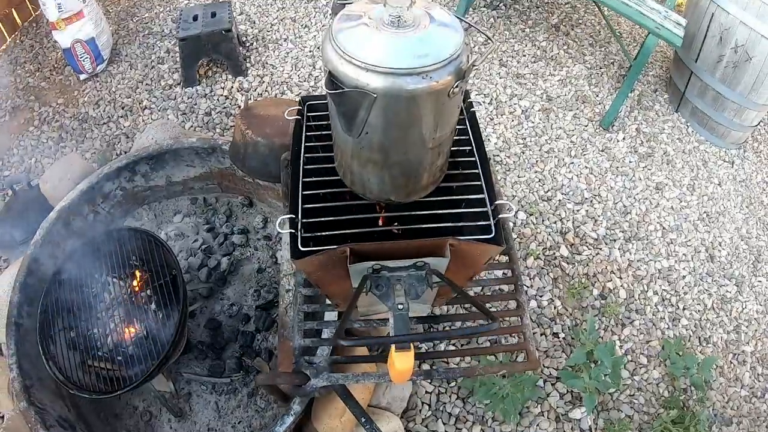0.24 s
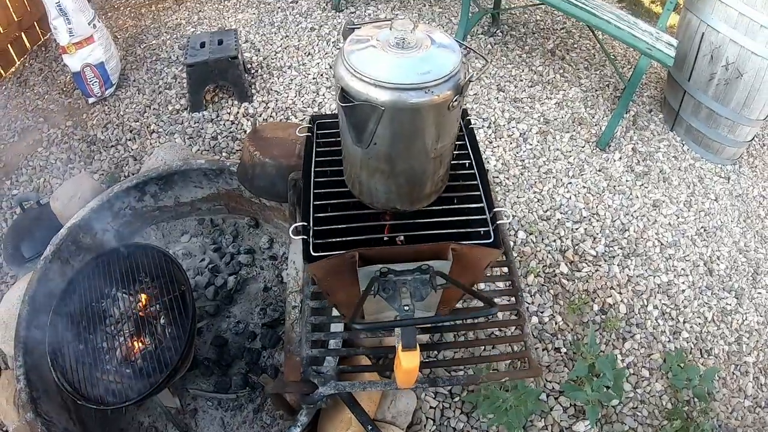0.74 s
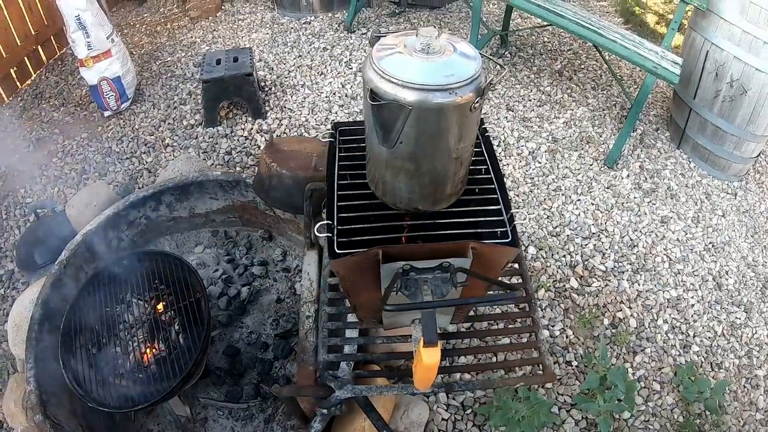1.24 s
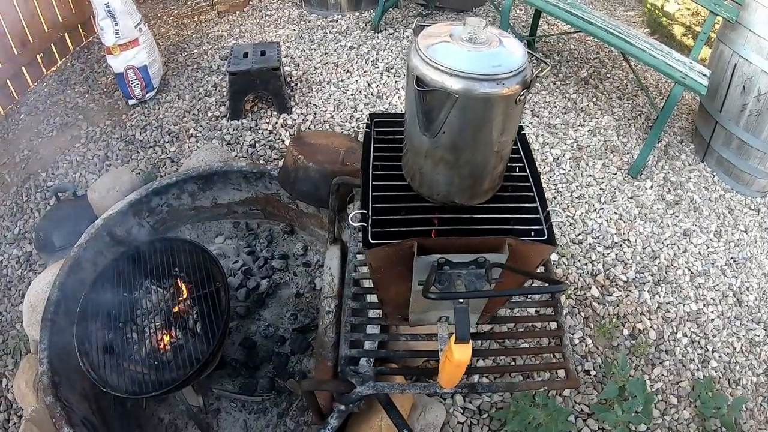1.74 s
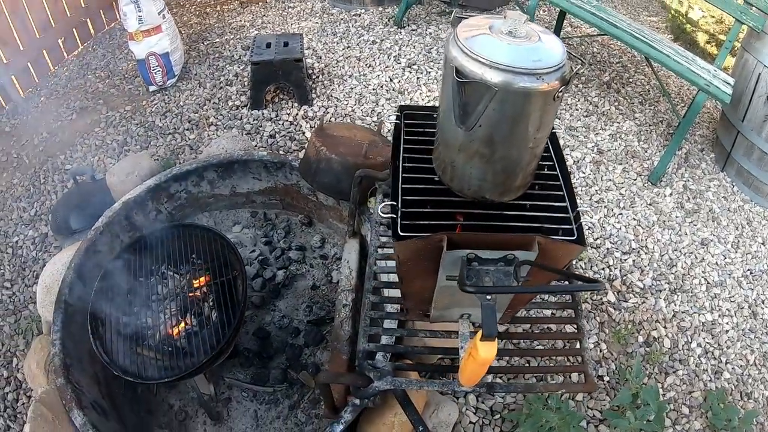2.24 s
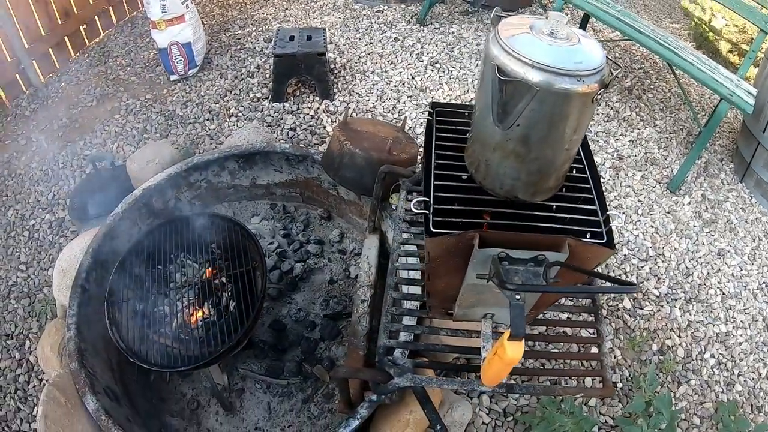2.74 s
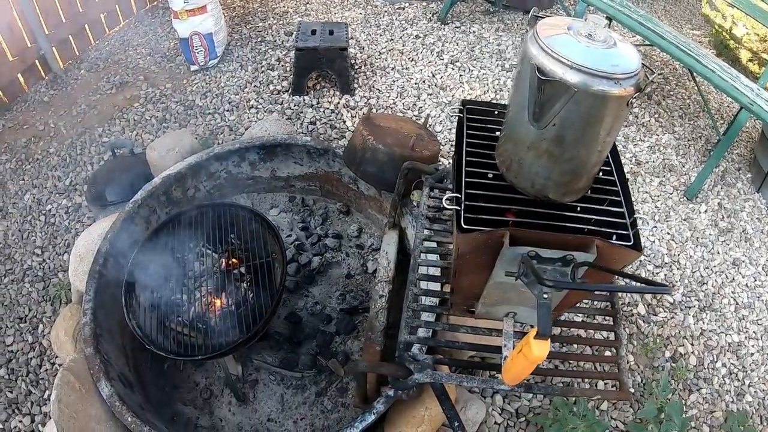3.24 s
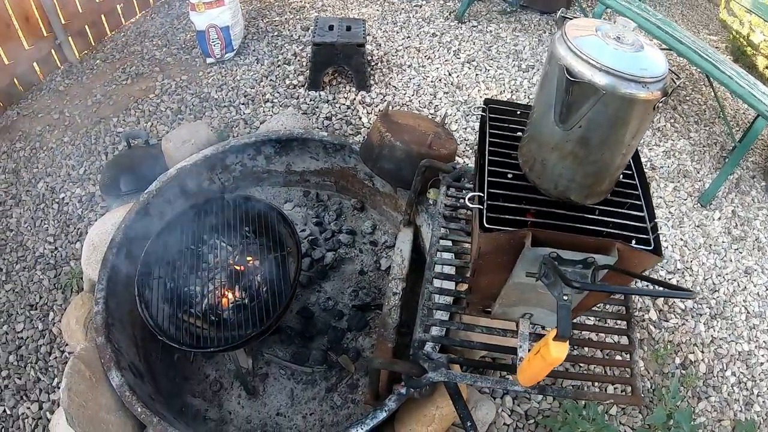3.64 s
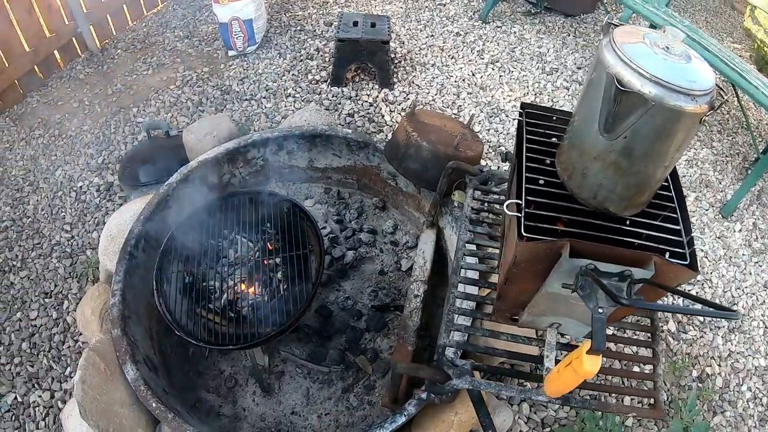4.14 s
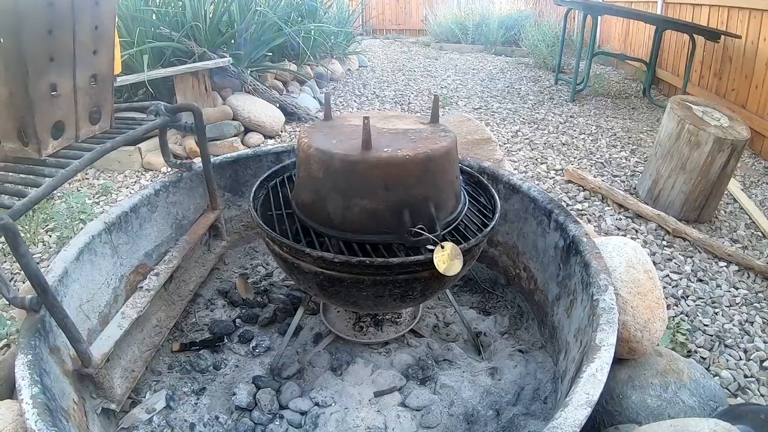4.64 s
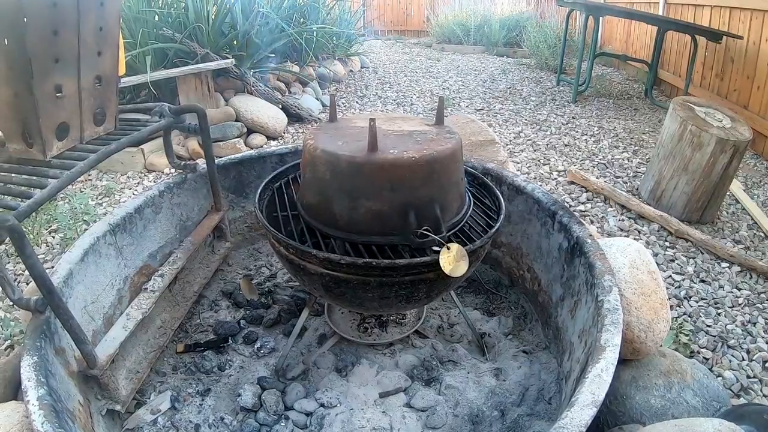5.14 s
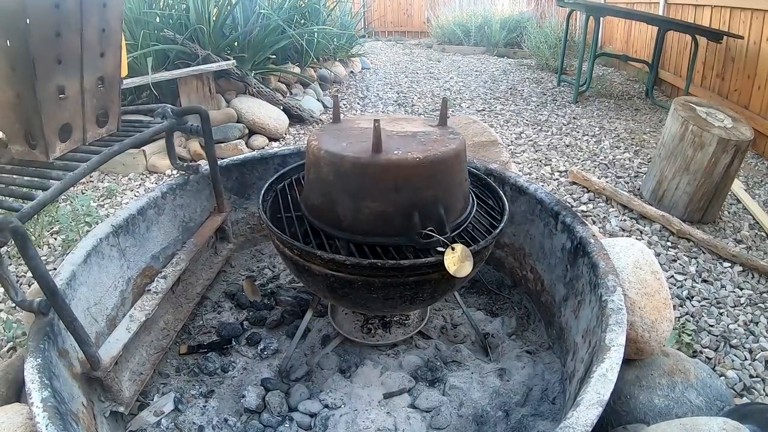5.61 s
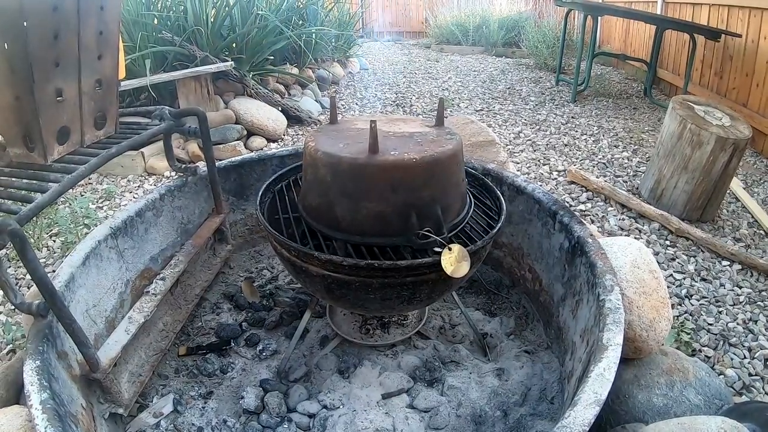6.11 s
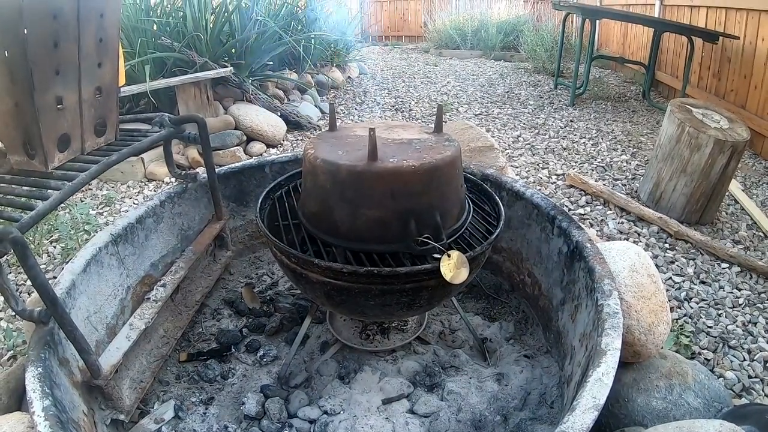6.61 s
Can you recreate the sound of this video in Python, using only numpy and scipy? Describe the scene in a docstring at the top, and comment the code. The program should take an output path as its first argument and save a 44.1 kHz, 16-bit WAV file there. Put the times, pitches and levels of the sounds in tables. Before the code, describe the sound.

Close outdoor sound of charcoal burning in a small grill within a steel fire ring. From 0 s a low fluttering flame murmur, smooth ember hiss and faint distant machine hum lie under dense tiny crackles. Sharp ringing pops scatter throughout, clustered from 0.3 to 0.8 s, with the loudest crack at 0.8 s and others near 1.1, 1.3 and 1.8 s. A small bird whistles quick falling three-note chips at about 0.65, 1.3, 2.0, 3.05 and 3.6 s. From 1.7 s the image widens and brightens, coals drifting right; the flame weakens, with a soft low flare near 3 s. A strong pop at 3.5 s rings the bowl low. Silence falls from 4.6 to 4.8 s. A soft low thump opens a narrower, more reflective place: sparse, duller ticks, weak pops, a low flare at 5.6 s, and bird chips at 5.2, 6.3 and 6.7 s until the end near 6.9 s.

```python
"""Charcoal burns in a small grill inside a steel fire ring in a gravel yard.
From the start, low noise bands make the flames, shaped noise the hiss, and a distant machine hums.
Tiny random bursts crackle and ringing bursts pop; a small bird soon whistles quick falling chips.
The stereo image widens for a while, the fire flares softly and some pops ring the bowl low.
After a short silence a second place, with stronger reflections, opens on a low thump; a flare follows."""
import sys
import numpy as np
from scipy import signal
from scipy.fft import rfft, irfft
from scipy.io import wavfile
from scipy.ndimage import uniform_filter1d

SR = 44100
rng = np.random.default_rng(int(sys.argv[2]) if len(sys.argv) > 2 else 0)


def output_pcm(signal):
    """Save a mono or channel-first signal as 16-bit PCM at the path in sys.argv[1].

    Samples are clipped to [-1, 1] before scaling.
    """
    pcm = np.clip(np.atleast_2d(signal).T, -1, 1) * 32767
    wavfile.write(sys.argv[1], SR, np.round(pcm).astype(np.int16))


N = 302876
TIME = np.arange(N) / SR
PAUSE = (4.578, 4.785)  # start and end of the silence [s]; the second place begins at its start

# loud splits of the coals: (time [s], level [dB], ring pitch [Hz], broad snap against the ring [dB])
LOUD_SPLITS = [(0.077, -18.5, 3830, -16), (0.314, -14, 3650, -21), (0.3402, -20.5, 4030, -25),
               (0.388, -14, 3200, -15), (0.6019, -19, 3560, -13), (0.6303, -14.5, 3420, -18),
               (0.71, -14, 4140, -9), (0.736, -13, 3670, -15), (0.7387, -9, 3394, -10),
               (0.8027, 13, 3395, -10), (0.8407, -19, 3400, -5), (0.959, -25, 3467, 4),
               (1.1333, -6.5, 3480, -5.5), (1.2172, -16, 3478, -6), (1.2289, -13, 3950, -6),
               (1.3355, -7.5, 3400, -4.5), (1.5058, -16, 3178, -9), (1.5243, -15, 3950, -2),
               (1.755, -10.5, 4000, -7.5), (1.822, -15, 3960, 0.5), (1.8436, -2.5, 3700, -9.5),
               (1.912, -13.5, 3980, -11.5), (2.2272, -17, 3380, -7), (2.251, -21.5, 3740, 1),
               (2.2894, -15.5, 4830, -2.5), (2.5261, -13, 3440, -4.5), (2.6587, -21, 4050, -0.5),
               (2.7986, -21.5, 3280, 1), (2.8842, -13.5, 3340, -4.5), (2.8911, -16, 3200, -3),
               (3.047, -19, 4200, -1.5), (3.2306, -27.5, 4300, 1.5), (3.5201, 3.5, 2880, -10),
               (3.619, -31, 4470, 6), (3.6322, -18, 4900, -8), (3.8036, -20.5, 3280, -5),
               (3.9399, -14.5, 4230, 2.5), (4.1402, -18.5, 3800, -18), (4.2216, -8.5, 3540, -3),
               (4.431, -20, 4000, 2), (4.4914, -19, 2820, -7.5), (4.529, -5.5, 4200, -5.5),
               (4.8976, -30.5, 3090, -12.5), (4.9747, -26.5, 4560, -14), (5.193, -23.5, 4230, -3),
               (5.385, -24.5, 3190, -4), (5.3935, -25, 3280, -9), (5.4718, -25, 4730, -2),
               (5.6483, -15.5, 2880, -11), (5.6659, -19, 4840, -3.5), (5.9263, -23.5, 2800, -4.5),
               (6.307, -23.5, 3130, -2.5), (6.4876, -24.5, 3010, -6.5)]
# strength of the burning, which drives flames and crackle: (time [s], level [dB])
BURNING = [(0, -53.5), (.4, -51), (1.8, -52), (2.6, -56.5), (3.9, -62), (4.56, -61.5), (4.84, -70),
           (5.5, -60.5), (5.9, -57), (6.87, -56.5)]
# top treble of the crackle and the hiss at the (first, second) place [dB]
FIZZ_DB = (-9, -17.5)


def amp(db):
    """Turns decibels into a gain."""
    return 10 ** (np.asarray(db) / 20)


def evened(x):
    """Scales a sound to an rms (average strength) of 1."""
    return x / np.sqrt(np.mean(x ** 2) + 1e-20)


def read(points, hz):
    """Reads a level curve at the given pitches, on a log-frequency axis."""
    f, value = np.transpose(points)
    return np.interp(np.log(hz + 1e-9), np.log(f), value)


def follow(rows, t):
    """Reads every column of a time curve at the times t."""
    s, *columns = np.transpose(rows)
    return [np.interp(t, s, column) for column in columns]


def by_place(pair, t):
    """Gives the first value at the first place and the second value from the pause on."""
    return np.where(t < PAUSE[0], *pair)


def opening(t):
    """Tells how far the stereo image is open, from 0 to 1."""
    # (time [s], opening [0-1])
    open_curve = [(1.7, 0), (2.2, 0.31), (3.3, 0.99), (4.55, 1), (4.75, 0)]
    return np.clip(follow(open_curve, t)[0], 0, 1)


def add(mix, s, sound):
    """Mixes a sound in, starting at s seconds."""
    part = mix[..., max(round(s * SR), 0):][..., :sound.shape[-1]]
    part += sound[..., :part.shape[-1]]


def frames(size):
    """Gives the times (a column) and frequencies (a row) of short-time spectra."""
    hop = size // 4
    times = np.arange(N // hop + 5) * hop / SR
    return times[:, None], np.fft.rfftfreq(size, 1 / SR)


def noise(field_db, patchy_db, size):
    """Stereo noise of rms 1: random spectra follow a field of levels, with drifting strong patches."""
    # likeness of left and right: (frequency [Hz], likeness [0-1])
    likeness = [(30, .85), (250, .88), (600, .2), (1400, .1), (3000, .25), (7000, .1), (14000, 0)]
    a, b, c, d, patches = rng.standard_normal((5,) + field_db.shape)
    patches = uniform_filter1d(patches, size=6, axis=0)  # smooth along time
    patches = evened(uniform_filter1d(patches, size=10, axis=1))  # smooth along frequency
    same = np.clip(read(likeness, frames(size)[1]), -1, 1)
    left = a + 1j * b
    right = same * left + np.sqrt(1 - same ** 2) * (c + 1j * d)
    spectra = np.array([left, right]) * amp(field_db + patchy_db * patches)
    _, sound = signal.istft(spectra.transpose(0, 2, 1), nperseg=size, noverlap=size - size // 4)
    return evened(sound[:, :N])


def narrow(hz, width_hz):
    """Noise of rms 1 squeezed into one narrow resonance."""
    f = np.fft.rfftfreq(N, 1 / SR)
    resonance = 1 / (1 + (2 * (f - hz) / width_hz) ** 2)
    return evened(irfft(rfft(rng.standard_normal(N)) * resonance, N))


def crack(colour, decay_s, rise_s, scatter=0.2, apart=1.0, size=1024, index=64):
    """One fracture in stereo: it builds up, snaps at sample index, scatters among the coals and rings."""
    # resonances all splits share, of the grill bowl and microphone opening: (frequency [Hz], gain [dB])
    shared_rings = [(1900, -2), (2500, -3), (3200, 1.5), (3900, -1.5), (4800, 0), (5400, -1), (6000, 0),
                    (6900, -2), (7900, -0.5), (9500, -4)]
    t = (np.arange(size) - index) / SR
    hz = np.fft.rfftfreq(size, 1 / SR)
    common, side = rng.standard_normal((2, size))
    grains = np.array([common + apart * side, common - apart * side])
    swell = np.exp(-abs(t) / np.where(t < 0, rise_s, decay_s))
    burst = rfft(scatter * grains * swell + (t == 0))
    # level out the broad colour but keep the fine comb
    burst /= np.sqrt(uniform_filter1d(abs(burst.mean(0)) ** 2, size=23))
    log_gain = np.log(amp(read(colour, hz) + read(shared_rings, hz)))
    # minimum phase: the colour rings only after each grain, never before it
    mirrored = np.r_[log_gain, log_gain[-2:0:-1]]
    causal = np.exp(np.conj(signal.hilbert(mirrored)))[:len(hz)]
    return irfft(burst * causal)


def flames(level_db=-1.0, flutter_db=3.0):
    """Unsteady burning: a low, fluttering noise band that also sounds the air in the fire ring."""
    # (multiple of the flutter pitch, level [dB])
    flame_shape = [(.15, -16.5), (.38, -21.5), (.55, -24), (.72, -3.5), (1, 2), (1.3, -4), (1.7, -14),
                   (2.6, -21), (5, -50)]
    # air in the fire ring: (frequency [Hz], width [Hz], level against the burning curve [dB])
    pit_modes = [(151.4, 12, -11.5), (215.1, 5.7, -9.5)]
    flutter_hz = (217.2, 167)  # at the (first, second) place
    t, hz = frames(size=2048)
    roar = noise(read(flame_shape, hz / by_place(flutter_hz, t)), patchy_db=flutter_db, size=2048)
    roar /= np.sqrt(uniform_filter1d((roar ** 2).mean(0), size=9000))  # even out slow swells
    pit = sum(amp(db) * narrow(mode_hz, width_hz) for mode_hz, width_hz, db in pit_modes)
    return amp(follow(BURNING, TIME)[0]) * (amp(level_db) * roar + pit)


def air():
    """Smooth yard air and the hiss of the embers: noise shaped for each of the two places."""
    # (frequency [Hz], relative level per Hz [dB]), before the top treble is lowered
    air_first = [(20, 0), (45, -14.5), (100, -6), (400, -12.5), (560, -12.5), (790, -5.5), (1050, -15),
                 (2400, -18.5), (4600, -13.5), (5900, -21.5), (8400, -23), (10500, -35), (12500, -27),
                 (16000, -44)]
    air_second = [(20, -6.5), (45, 7.5), (100, 2.5), (400, -11), (540, -11), (760, -3.5), (1100, -13),
                  (2500, -19.5), (4700, -14), (6100, -30), (8100, -40), (9200, -26), (12500, -33.5),
                  (16000, -42)]
    first_db, second_db = -63.5, -64
    t, hz = frames(size=1024)
    top_db = by_place(FIZZ_DB, t) * np.clip((hz - 8500) / 400, 0, 1)
    first = noise(read(air_first, hz) + top_db, patchy_db=.8, size=1024)
    second = noise(read(air_second, hz) + top_db, patchy_db=.5, size=1024)
    return by_place((amp(first_db) * first, amp(second_db) * second), TIME)


def lows():
    """The wavering machine hum, a low thump and two soft flares of the fire, all narrow noise bands."""
    # distant machine: (frequency [Hz], width [Hz], level [dB])
    hums = [(64.5, 6.7, -68.5), (1228, 8.4, -87.5)]
    # low flares and one thump: (time [s], frequency [Hz], level before swell and fade [dB], length [s])
    puffs = [(2.955, 267, -55, 0.81), (4.793, 59, -52, 0.1), (5.577, 264.4, -48.5, 0.43)]
    out = sum(amp(db) * narrow(hz, width_hz) for hz, width_hz, db in hums)
    for s, hz, db, length_s in puffs:
        u = np.maximum(TIME - s, 0) / length_s
        swell_and_fade = (1 - np.exp(-20 * u)) * np.exp(-2.5 * u)
        out += amp(db) * narrow(hz, 0.28 * hz) * swell_and_fade
    return out


def crackle(colour_db=4.5, count=40):
    """Tiny splits at random: livelier with the burning, clumped, and crowding around loud ones."""
    # colour of a tiny split: (frequency [Hz], level [dB])
    tick_colour = [(300, -22), (1000, -10), (1900, -4), (3300, 0), (4700, 1), (6000, -9), (8200, -3.5),
                   (10500, -12), (12300, -4), (16000, -33.5)]
    level_db = (-63, -66)  # at the mean strength of burning, at the (first, second) place
    crackle_per_flame = .55  # dB of crackle for each dB of burning
    ticks_per_s, crowding = (125, 27), 1.5  # basic rate at each place; its rise around a loud split
    clumps_db, clump_s = 3, .04  # depth and rough length of the random clumps

    crowd = sum(np.exp(-abs(TIME - s) / .018) for s, *_ in LOUD_SPLITS)
    clumps = amp(clumps_db * narrow(0, 1 / clump_s))
    per_s = by_place(ticks_per_s, TIME) * (1 + crowding * crowd) * clumps / clumps.mean()
    out = np.zeros((2, N))
    for _ in range(count):  # each spot on the coals has its own colour
        colour = [(hz, db + colour_db * rng.standard_normal()) for hz, db in tick_colour]
        size_db = 7 * np.minimum(rng.exponential(1, N), 2.8)
        ticks = (rng.random(N) < per_s / count / SR) * amp(size_db)
        tick = evened(crack(colour, decay_s=rng.uniform(.0004, .0016), rise_s=.0006))
        out += signal.oaconvolve(ticks[None], tick, axes=1)[:, :N]
    burning_db = follow(BURNING, TIME)[0]
    lively_db = by_place(level_db, TIME) + crackle_per_flame * (burning_db - burning_db.mean())
    high_pass = signal.firwin(101, 8800, pass_zero=False, fs=SR)
    fizz = signal.oaconvolve(out, high_pass[None], "same")
    return amp(lively_db) * evened(out + (amp(by_place(FIZZ_DB, TIME)) - 1) * fizz)


def pops(ring_db=3, heavy=1.66, dip_db=-7, top_db=-15, index=60):
    """Loud splits: each has its own ring; its snap sets the knock and thud below and the fizz above."""
    # at the (first, second) place: knock and fizz against the snap, thud against the scaled knock [dB]
    knock_db, fizz_db, thud_db = (-0.5, 7), (-8, -14.5), (-2, -2)
    out = np.zeros((2, N))
    for s, db, hz, snap in LOUD_SPLITS:
        knock = snap + by_place(knock_db, s)
        fizz = snap + by_place(fizz_db, s)
        thud = heavy * knock + by_place(thud_db, s)
        colour = [(100, thud - 14), (720, thud), (1150, thud - 5), (1700, knock),
                  (0.75 * hz, -4), (hz, ring_db), (1.306 * hz, -4), (6800, snap - 1), (8200, snap + 2),
                  (10300, fizz + dip_db), (12400, fizz), (16000, fizz + top_db)]
        split = crack(sorted(colour), decay_s=.0012, rise_s=.0007, scatter=.42, apart=.4)
        add(out, s - index / SR, amp(db) * split)
    return out


def yard(x, t60, dull_hz, size=16000):
    """Scatter from the steel ring, gravel and fence: a short tail whose treble dies first."""
    common, side = rng.standard_normal((2, size)) * (rng.random((2, size)) < .1)  # sparse reflections
    taps = np.array([common + .5 * side, common - .5 * side])
    taps = taps * (np.arange(size) > .002 * SR)  # nothing returns in the first 2 ms
    hz, t, spectra = signal.stft(taps, SR, nperseg=128)
    decay_db = -60 * t / t60 * (1 + hz[:, None] / dull_hz)
    tail = signal.istft(spectra * amp(decay_db), SR, nperseg=128)[1]
    return signal.oaconvolve(x, tail / np.linalg.norm(tail[0]), axes=1)[:, :N]


def bird(high_hz=4680, count=3):
    """Runs of three short whistles, no two alike, each falling in pitch."""
    # runs of chips: (time [s], level before random changes and the bird's overall gain [dB])
    chip_runs = [(0.65, -53), (1.31, -52), (1.978, -56), (3.05, -59), (3.631, -58.5), (5.199, -61.5),
                 (6.297, -53.5), (6.73, -54.5)]
    chip_s, gap_s, fall_hz = .030, .046, 560  # length, start-to-start gap, typical fall in pitch
    out = np.zeros(N)
    u = np.arange(0, 1, 1 / (chip_s * SR))  # progress through one chip
    swell = np.sin(np.pi * u ** .6) ** 1.2
    for s, db in chip_runs:
        for k in range(count):
            hz = high_hz - fall_hz * rng.uniform(.7, 1.3) * u ** 1.6
            hz = hz * rng.normal(1, .006)
            whistle = swell * np.sin(2 * np.pi * np.cumsum(hz) / SR)
            add(out, s + k * gap_s, amp(db + rng.normal(0, 1)) * whistle)
    return out * np.ones((2, 1))


def jolts(bowl_hz=740, t60=0.049):
    """Some splits jolt the grill bowl, which answers with one short low ring that dies away."""
    # (time [s], level [dB])
    bowl_jolts = [(3.52, -45), (4.22, -57), (5.192, -52.5)]
    t = np.arange(SR // 8) / SR
    out = np.zeros(N)
    for s, db in bowl_jolts:
        add(out, s, amp(db - 60 * t / t60) * np.sin(2 * np.pi * bowl_hz * t))
    return out


def scene(first_wet_db=-14, second_wet_db=-4, bird_db=-1.5, bird_wet_db=-7):
    """At the second place a pot covers the coals; coals and bird arrive more by reflection."""
    open_pan_db = -3  # left against right when fully open: the coals move right
    pan_db = open_pan_db * opening(TIME)
    coals = (pops() + crackle()) * amp([pan_db / 2, -pan_db / 2])
    wet_db = by_place((first_wet_db, second_wet_db), TIME)
    coal_echo = yard(coals * amp(wet_db), t60=0.15, dull_hz=19700)
    chips = amp(bird_db) * bird()
    direct = by_place((1, .45), TIME)
    bird_echo = yard(chips * amp(bird_wet_db) / np.sqrt(direct), t60=0.57, dull_hz=15000)
    return coals + coal_echo + jolts() + direct * chips + bird_echo + flames() + air() + lows()


def record(dry):
    """Opens and brightens the stereo image for a while, silences the pause and limits the treble."""
    open_fizz_db, edge_hz = 12.5, 16100  # treble lift when fully open; upper edge of the sound
    width = opening(TIME)
    fizz_band = signal.firwin(101, [8900, 11500], pass_zero=False, fs=SR)
    fizz = signal.oaconvolve(dry, fizz_band[None], "same")
    left, right = dry + (amp(open_fizz_db * width) - 1) * fizz
    mid, side = (left + right) / 2, (left - right) / 2
    # while closed, only the top treble differs between left and right
    top = signal.oaconvolve(side, signal.firwin(61, 9500, pass_zero=False, fs=SR), "same")
    side = width * side + (1 - width) * .5 * top
    heard = (TIME < PAUSE[0]) | (TIME > PAUSE[1])
    running = uniform_filter1d(1. * heard, size=100)  # soft edges on the silence
    out = np.array([mid + side, mid - side]) * running
    low_pass = signal.firwin(255, edge_hz, window=("kaiser", 9), fs=SR)
    return signal.oaconvolve(out, low_pass[None], "same")


dry = scene()
out = record(dry)
output_pcm(out)
```